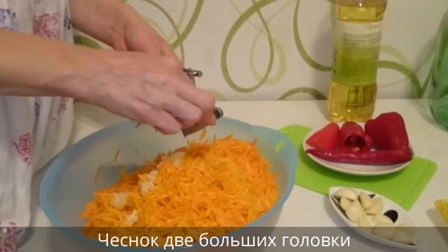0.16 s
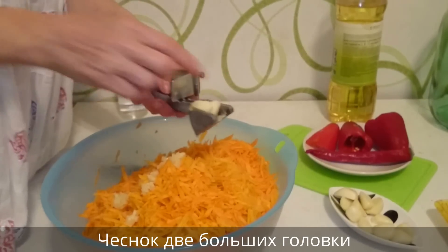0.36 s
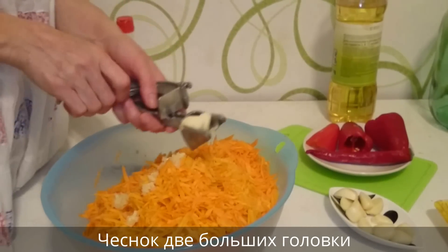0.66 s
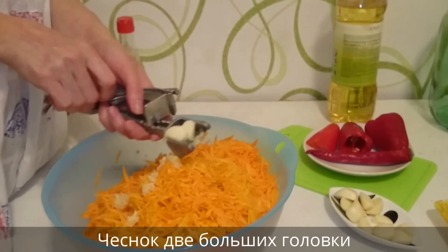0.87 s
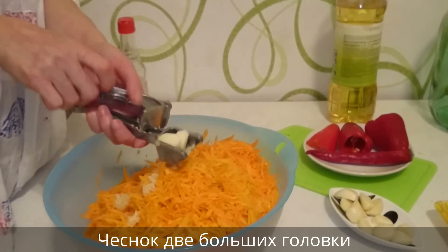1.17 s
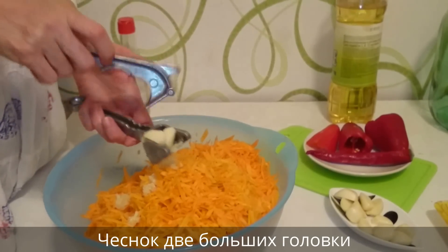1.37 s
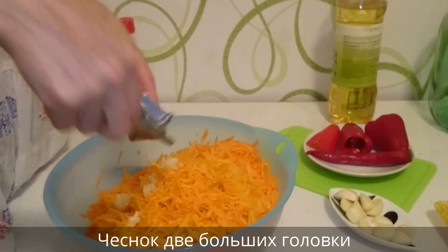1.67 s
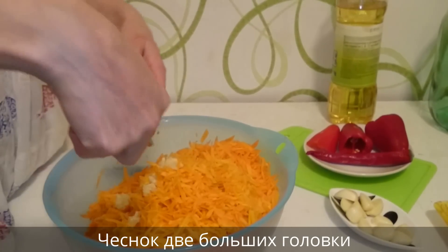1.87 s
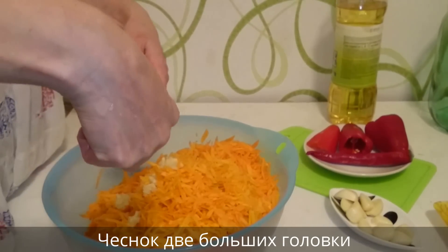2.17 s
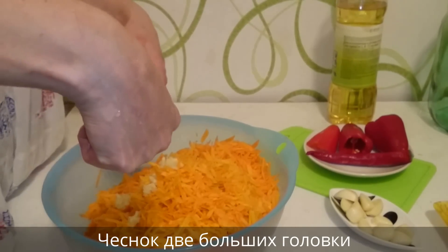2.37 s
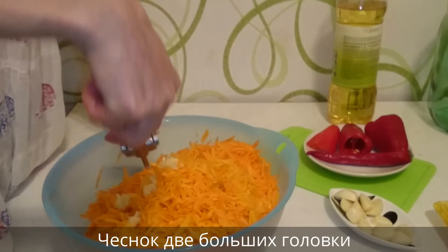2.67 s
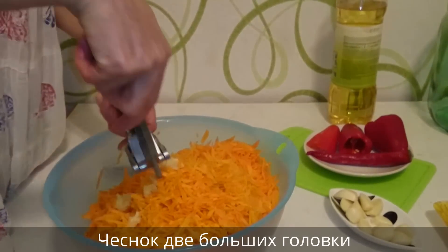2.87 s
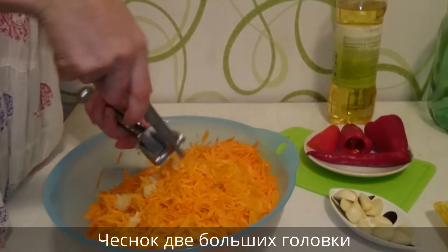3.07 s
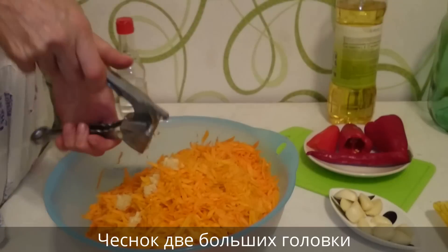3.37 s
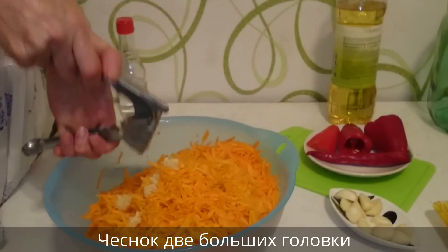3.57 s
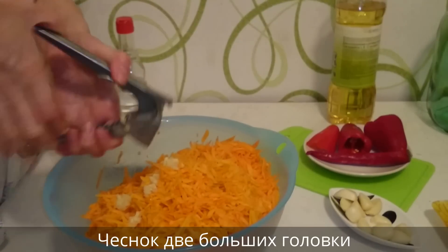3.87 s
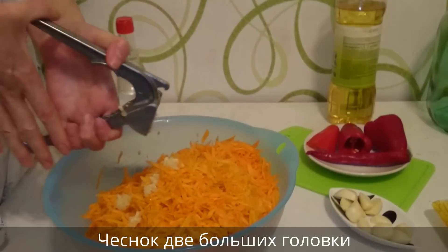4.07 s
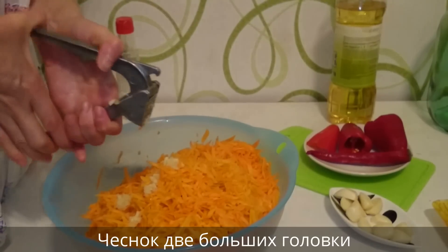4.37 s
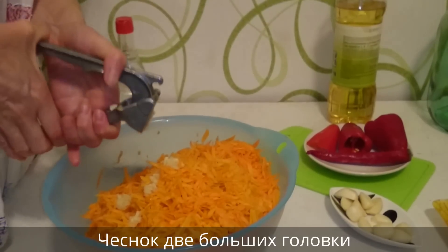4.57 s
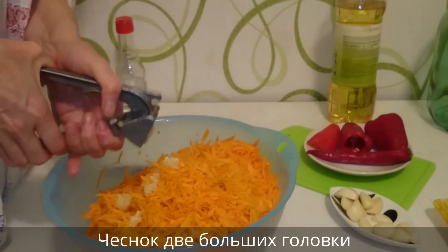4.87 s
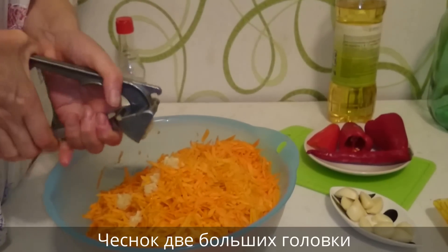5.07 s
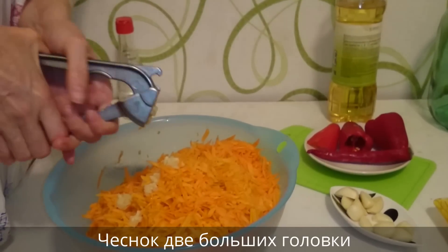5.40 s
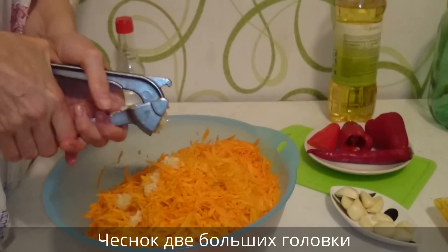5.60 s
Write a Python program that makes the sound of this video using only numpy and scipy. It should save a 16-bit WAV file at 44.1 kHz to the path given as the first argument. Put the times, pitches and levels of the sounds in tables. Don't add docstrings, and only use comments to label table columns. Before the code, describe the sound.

Close up in a small reflective kitchen, hands work a metal garlic press. Light clinks come first, then a pause broken by a wind bump on the right, a burst of hard bright clanks, and finally irregular hinge clicks with garlic crunching and soft scraping. Quiet hiss throughout; the left side is brighter, the right rumbly and duller.

```python
import sys
import numpy as np
from scipy import signal
from scipy.fft import rfft, irfft, next_fast_len
from scipy.io import wavfile
from scipy.ndimage import uniform_filter1d

SR = 44100
rng = np.random.default_rng(int(sys.argv[2]) if len(sys.argv) > 2 else 0)


def log_audio(samples):
    frames = np.atleast_2d(samples).T
    limited = np.clip(frames, -1, 1)
    pcm = np.round(limited * 32767).astype(np.int16)
    wavfile.write(sys.argv[1], SR, pcm)


def boost_factor(decibels):
    exponent = np.asarray(decibels, float) / 20
    return 10 ** exponent


N = 253134


def evened(x):
    return x / np.sqrt(np.mean(x ** 2) + 1e-20)


def read(points, hz):
    f, value = np.transpose(points)
    return np.interp(np.log(hz + 1), np.log(f + 1), value)


def add(mix, start_s, sound):
    part = mix[round(start_s * SR):][:len(sound)]
    part += sound[:len(part)]


def coloured(x, points):
    size = next_fast_len(len(x))
    gain = boost_factor(read(points, np.fft.rfftfreq(size, 1 / SR)))
    return irfft(rfft(x, size) * gain, size)[:len(x)]


def band(x, low_hz, high_hz):
    limits = [low_hz, min(high_hz, SR / 2.1)]
    return signal.sosfilt(signal.butter(2, limits, "band", fs=SR, output="sos"), x)


def clink(peak_db, linger_db, t60_s, crack_db, tilt_db, modes):
    # pitch_hz, level_db per Hz
    crack_colour = [(180, -62.5), (300, -34), (1250, -23.5), (2930, -5.5), (3520, -6), (3830, -1),
                    (5900, -2), (7080, -10), (8790, -13), (10400, -18.5), (12100, -29), (15000, -26.5),
                    (16400, -37)]
    t = np.arange(12000) / SR
    ring, power = 0, 0
    gripped = boost_factor(-60 * t / 0.02)
    for hz, split_hz, db in modes:
        faster = 2.0 + 0.22 * (hz - 4000) / 5000
        linger = boost_factor(linger_db - 60 * t / t60_s * faster)
        for side in (-0.5, 0, 0.4):
            cycles = (hz + side * split_hz) * t + rng.random()
            tone = boost_factor(1.14 * db) * np.sin(2 * np.pi * cycles)
            ring = ring + tone * (gripped + linger)
            power += np.mean(tone ** 2)
    crack = coloured(rng.standard_normal(len(t)), crack_colour)
    crack = evened(coloured(crack, [(2000, -tilt_db), (12000, tilt_db)]))
    blow = ring / np.sqrt(power) + crack * boost_factor(crack_db) * gripped
    blow = blow * np.minimum(t / 0.00037, 1)
    rebound = np.roll(blow, round(0.0031 * SR)) * (t > 0.0028)
    blow = blow + 0.12 * rebound
    return boost_factor(peak_db) * blow / (3.3 * np.std(blow[:round(0.005 * SR)]))


def knocking_parts():
    # (start_s, peak_db, crack_db, crack_brightness_db)
    rattle = ((-9, 0.094), [(2330, 240, 4), (3050, 50, 8), (3800, 73, 15), (5197, 60, 15), (6160, 96, 12),
              (8900, 200, -16)], [(0.6789, -42, 1, 2), (0.6918, -35.5, -2, -1), (0.7098, -33.5, 0, -7),
              (0.7494, -42, -1, -8), (0.7794, -41.5, -5, -34)])
    loading = ((-20, 0.19), [(3950, 41, -5), (5970, 63, 2.5), (6700, 34, -14), (7800, 29, -13),
               (8960, 120, -17), (10150, 170, -28), (14000, 32, -29), (14700, 28, -44), (14800, 37, -39)],
               [(0.9921, -27.5, -4, 5.2)])
    tapped = ((-6.5, 0.13), [(3685, 170, -2), (4060, 200, -6), (4530, 60, -12), (5140, 50, -3.5),
              (5550, 90, -6), (5850, 100, -4), (6070, 52, -2), (7660, 30, -11), (8900, 100, -19),
              (14600, 100, -26)], [(1.0685, -29.5, 1.8, 0), (1.0715, -34.5, 0, 0)])
    swung = ((-2.5, .25), [(1805, 58, -16.5), (2505, 81, -16), (2900, 140, -16), (3672, 64, 4),
             (4380, 89, -1), (5010, 49, -18), (6030, 77, -22), (6770, 81, -4), (7520, 31, -11.5),
             (9940, 23, -10), (10540, 28, -13), (11030, 48, -17), (13800, 140, -25), (14500, 51, -28)],
             [(1.2605, -18.5, 1.5, -3.5), (1.2665, -26, 3.3, -7)])
    closed = ((-15, 0.097), [(1812, 320, -25.5), (4407, 120, -13), (6334, 160, -9), (8800, 140, -46)],
              [(2.2223, -25.5, -8.5, -.5)])
    seated = ((-9, 0.15), [(3030, 48, -11), (3440, 30, -7), (4000, 27, -4.5), (4430, 150, -1.5),
              (5380, 71, -13), (5900, 15, -1), (5780, 34, -0.5), (5850, 18, -1.5), (6720, 100, -17),
              (8950, 96, -7.5), (9080, 22, -14), (9380, 44, -21), (10180, 140, -22.5), (14000, 37, -37)],
              [(2.4189, -36.5, 20.5, -8), (2.4478, -13, -0.5, -1.5), (2.4518, -20, 5, -1.5)])
    squeezed = ((-12.5, .14), [(3890, 25, -14), (4270, 37, -12.5), (4484, 30, -9), (5100, 84, 5),
                (5470, 23, -13.5), (5910, 15, -7.5), (6163, 36, 3), (7030, 81, -3), (7700, 25, -15.5),
                (8140, 62, -9.5), (9740, 50, -7.5), (13200, 35, -40), (14000, 180, -37),
                (14800, 41, -26.5)], [(2.5044, -27, 3, 1), (2.5075, -29, 3, 1), (2.5155, -16, 4, 3.5),
                (2.52, -18.5, 4, 3)])
    eased = ((-30, .057), [(3035, 320, -1), (4630, 190, -3.5), (5100, 690, -23.5), (8650, 110, -22.5)],
             [(2.7571, -37.5, 3, -4), (2.7894, -47, 2.5, -9)])
    tilted = ((-20.5, .1), [(2290, 41, -4.5), (2920, 37, -3.5), (4000, 40, -6), (5550, 60, -4),
              (5700, 41, -10), (7100, 46, 5), (7200, 61, -11.5), (8600, 50, -11), (10700, 100, 2.5),
              (12800, 64, -24), (13700, 220, -26), (14900, 55, -14)], [(2.9287, -21, 2, 0.0047),
              (2.9305, -28, 1.8, 0.011)])
    bottomed = ((-14.5, .16), [(2689, 16, -6), (4600, 39, -16), (5250, 200, -6.5), (5617, 83, -12.5),
                (6380, 27, -15), (7250, 160, -3), (8250, 23, -13), (8780, 82, -3), (9830, 97, -9.5),
                (10600, 120, -13), (11500, 24, -18), (12700, 97, -25.5), (14440, 70, -20.5),
                (14900, 48, -16.5)], [(2.9637, -10.5, 2.4, 6), (2.9662, -13, 1.8, 6.8)])
    released = ((-24.5, .1), [(2720, 130, 6.5), (3080, 41, 4), (4300, 110, -8.5), (5030, 90, -13),
                (5030, 24, -4), (6000, 123, 21), (7900, 18, 8), (8190, 15, -6.5), (10200, 60, -14.5),
                (12500, 100, -25), (13850, 44, -25.5), (15000, 68, -14.5)], [(3.0578, -20, 0, 7)])
    pried = ((-17, .08), [(2300, 260, -15), (3410, 330, -17), (5300, 360, -1), (5590, 86, 4.5),
             (6010, 260, -2), (10700, 330, -20)], [(3.5482, -21.5, -16, 0), (3.5515, -37, -16, 0),
             (3.5565, -37.5, -21, 0)])
    sprung = ((-29, .06), [(2290, 320, -1.5), (3270, 610, -18), (4350, 430, -9), (4900, 400, -3),
              (5720, 700, -1.5), (10700, 460, -9)], [(3.7262, -27, 2.5, -1.8), (3.7285, -32, 3, -2.9),
              (3.732, -46, 3.4, -2)])
    muffled = ((-33, .05), [(2090, 220, -14), (2430, 190, -7), (2700, 210, -11), (3320, 580, -19)],
               [(4.4244, -44, -15, -2), (4.4353, -32, 0, -1), (4.4558, -22, -4, -3), (4.4664, -39, 0, -12)])
    palm = ((-5, 0.15), [(192, 110, 7), (420, 160, -9.5), (557, 270, -6.5), (960, 200, -9.5)],
            [(1.2605, -53, -26, -8), (2.815, -52.5, -26, -4.5), (4.3, -47.5, -26, -8),
            (4.7395, -61, -19, -4)])
    handle = ((-14, 0.13), [(124, 30, -8), (460, 120, -3.5), (630, 69, 0), (833, 138, -7), (1033, 320, -8),
              (2310, 510, -7)], [(5.0318, -35, -30, 0.28)])
    holds = (rattle, loading, tapped, swung, closed, seated, squeezed, eased, tilted, bottomed,
             released, pried, sprung, muffled, palm, handle)
    out = np.zeros(N)
    for ring, modes, strikes in holds:
        for start_s, peak_db, crack_db, tilt_db in strikes:
            add(out, start_s, clink(peak_db, *ring, crack_db, tilt_db, modes))
    return out


def snap(peak_db, hz, low_db, bright_db, ms):
    t = np.arange(2000) / SR
    shape = np.exp(-t * 1000 / ms) * np.minimum(t / 0.0004, 1)
    burst = rng.standard_normal((3, len(t))) * shape
    ring = np.sin(2 * np.pi * hz * t) * shape + 2.4 * band(burst[0], hz * 0.72, hz * 1.4)
    low = band(band(burst[1], 1360, 5300), 1360, 5300)
    bright = band(band(burst[2], 5600, 13200), 5600, 13200)
    out = ring / abs(ring).max()
    out = out + boost_factor(low_db + 15) * low / abs(low).max()
    out = out + boost_factor(bright_db + 2) * bright / abs(bright).max()
    return boost_factor(peak_db - 3.0) * out


def hinge_ticks():
    # start_s, peak_db, ring_hz, low_knock_db, bright_crack_db
    ticks = [(3.2925, -42.5, 6400, -35, -14), (3.3045, -34, 10600, -32.5, -5),
             (3.3222, -37, 5360, -33, -18), (3.3276, -39.5, 11100, -35, -13), (3.346, -25, 4900, -40, -13),
             (3.357, -47, 9600, -32, -30), (3.3648, -29.5, 14900, -40, -15.5),
             (3.368, -37, 14000, -40, -21), (3.4412, -39.5, 5100, -19.5, -6),
             (3.548, -20, 5500, -32.5, -15), (3.6786, -32.5, 7400, -17.5, -12.5),
             (3.726, -25.5, 4660, -21, -9.5), (4.3585, -45.5, 6900, -26, -14),
             (4.4079, -30, 4800, -39, -14), (4.4365, -15.5, 5730, -22.5, -13),
             (4.5062, -33.5, 5840, -33, -13), (4.5703, -31.5, 4970, -19, -5), (4.6127, -30, 6000, -33, -8),
             (4.6193, -25.5, 9100, -33, -9.5), (4.6423, -21.5, 5440, -21.5, -6),
             (4.718, -41.5, 5320, -35, -10), (4.7394, -26, 6500, -15, -12), (4.79, -29.5, 9000, -35, -4.5),
             (4.7919, -20, 5180, -46, -20.5), (4.8586, -26.5, 8860, -28, -32),
             (5.0325, -38.5, 5300, -11, -7), (5.1983, -56.5, 9660, -15.5, 3.5), (5.3289, -61, 4170, -26, 5),
             (5.5163, -26, 5100, -32, -20)]
    out = np.zeros(N)
    for start_s, peak_db, hz, low_db, bright_db in ticks:
        add(out, start_s, snap(peak_db, hz, low_db, bright_db, ms=0.42))
    return out


def clove_crunches():
    # start_s, peak_db, ring_hz, length_ms
    crunches = [(3.35, -52, 5100, 3.2), (3.37, -43, 5300, 5.6), (3.5135, -48, 4850, 0.39),
                (3.537, -34.5, 4700, 1.7), (3.5686, -36, 5590, 1.1), (3.686, -38, 5600, 1.9),
                (3.7314, -49, 5100, 2.8), (4.4254, -26, 4960, 6.2), (4.4398, -17.5, 4700, 0.67),
                (4.4585, -24, 5600, 4.5), (4.4655, -16.5, 5100, 2), (4.648, -26, 5300, 1.8),
                (4.6535, -32, 5300, 1), (4.6485, -20.5, 3350, 0.91), (4.7453, -24.5, 8900, 2.9),
                (4.74, -22, 5740, 1.1), (4.7535, -33, 8400, 1.4), (4.7514, -25.5, 7300, 1.9),
                (4.8657, -29, 5250, 1.2)]
    out = np.zeros(N)
    for start_s, peak_db, hz, ms in crunches:
        add(out, start_s, snap(peak_db, hz, -64 - peak_db, -45.5 - peak_db, ms))
    return out


def scrape(times_s, pressure_db, bright_db):
    # pitch_hz, level_db per Hz
    scrape_colour = [(530, -7), (900, -9), (1390, -11), (2470, -5), (3430, 0.5), (3730, 2), (5680, 2.5),
                     (9530, -4), (12100, -10.5), (14500, -5.5), (16000, -20)]
    t = np.arange(times_s[0], times_s[-1], 1 / SR)
    slips = (rng.random(len(t)) < 14000 / SR) * rng.standard_normal(len(t))
    clumps = boost_factor(5.0 * evened(uniform_filter1d(rng.standard_normal(len(t)), size=120)))
    grit = evened(coloured(slips * clumps, scrape_colour))
    dull = signal.sosfilt(signal.butter(2, 7000, fs=SR, output="sos"), grit)
    grit = dull + (grit - dull) * boost_factor(bright_db)
    pressure = boost_factor(np.interp(t, times_s, pressure_db) - 12.5)
    return grit * pressure * signal.windows.tukey(len(t), 0.03)


def sliding_strokes():
    # full_pressure_from_s, held_s, pressure_db, brightness_db
    strokes = [(0.674, 0.031, -47.5, -10), (.765, 0.03, -51, -12), (3.129, 0.2, -51.5, 0),
               (3.31, 0.026, -54.5, 5), (3.359, 0.022, -49.5, 1), (3.51, 0.063, -47, 1.5),
               (3.67, 0.034, -42, -1.5), (4.287, .012, -56, -8), (4.43, 0.045, -44.5, 2),
               (4.59, 0.038, -49, 8.5), (4.645, 0.011, -52.5, 7), (4.735, 0.03, -36.5, 7),
               (4.82, 0.022, -55, -1), (5.265, .012, -54.5, -14), (5.51, 0.051, -55.5, 14.5),
               (5.575, 0.054, -45, 6.5), (5.725, .02, -42.5, 9)]
    press_s, lift_s, lifted_db = 0.06, 0.16, -24.5
    out = np.zeros(N)
    for full_s, held_s, db, bright_db in strokes:
        times_s = np.cumsum([full_s - press_s, press_s, held_s, lift_s])
        pressure_db = db + lifted_db * np.array([1, 0, 0, 1])
        add(out, times_s[0], scrape(times_s, pressure_db, bright_db))
    return out


def close_by(press):
    # delay_ms, level_db
    near_echoes = [
        [(1.1, -22.5), (2.1, -10), (2.9, -8.5), (3.7, -13), (5.3, -10), (6.6, -15), (8.3, -16)],
        [(.7, -16), (1.6, -17), (2.3, -6.5), (3.3, -11), (4.4, -7.5), (5.9, -14), (7.6, -15.5)],
    ]
    direct_db = [
        [5.5],
        [1.5],
    ]
    near = np.array([press, np.roll(press, 6)])
    for port, echoes in enumerate(near_echoes):
        for ms, db in echoes:
            add(near[port], ms / 1000, boost_factor(db) * press)
    return near * boost_factor(direct_db)


def kitchen(press):
    # pitch_hz, t60_s
    fading = [(300, 0.68), (1500, 0.46), (4000, 0.31), (8000, 0.27), (15000, 0.31)]
    room_db = [
        [1],
        [3],
    ]
    taps = np.zeros((2, SR // 2))
    at = np.arange(200, SR // 2 - 20, 20)
    at = at + rng.integers(0, 20, (2, len(at)))
    np.put_along_axis(taps, at, rng.choice([-1., 1.], at.shape), 1)
    hz, t, z = signal.stft(taps, SR, nperseg=256)
    decay = boost_factor(-60 * t / read(fading, hz)[:, None])
    tail = signal.istft(z * decay, SR, nperseg=256)[1]
    tail = tail * (np.arange(tail.shape[1]) >= 180)
    tail = tail / np.linalg.norm(tail[0])
    return boost_factor(room_db) * signal.fftconvolve(press[None], tail, axes=1)[:, :N]


def gust():
    # peak_s, signed_size, build_up_ms, release_ms
    pushes = [
        (2.167, -0.15, 0.73, 0.88),
        (2.1835, -0.32, 0.39, 0.62),
        (2.1828, -0.2, 7.8, 20),
        (2.435, -0.045, 1.5, 1.3),
        (2.439, -0.09, 0.74, 3.1),
        (2.4408, 0.056, 1.3, 0.53),
    ]
    # time_s, level_db
    air_level = [(2.13, -82), (2.152, -44), (2.158, -34.5), (2.167, -29.5), (2.183, -24.5), (2.185, -56),
                 (2.195, -35)]
    t = np.arange(N) / SR
    membrane = np.zeros(N)
    for peak_s, size, up_ms, down_ms in pushes:
        speed_ms = np.where(t < peak_s, up_ms, down_ms)
        membrane += size * np.exp(-abs(t - peak_s) * 1000 / speed_ms)
    air = rng.standard_normal(N) * boost_factor(np.interp(t, *np.transpose(air_level), -150, -150))
    return membrane + 0.82 * band(air, 4000, 6300) + 0.17 * air + 0.66 * band(air, 88, 1500)


def hush():
    # pitch_hz, level_db per Hz
    left_noise = [(2, -81), (5, -73.5), (9, -78.5), (20, -81.5), (40, -73.5), (100, -88), (250, -89),
                  (600, -97), (1500, -105.0), (4000, -108.9), (8000, -112.0), (12000, -115.1),
                  (13800, -107.0), (16000, -123.4)]
    right_noise = [(2, -37.5), (5, -36.5), (9, -39.5), (20, -48), (40, -67.5), (100, -74.5), (250, -86.5),
                   (600, -93), (1500, -101), (4000, -103.7), (8000, -109.3), (12000, -111.7),
                   (13800, -111.8), (16000, -115.7)]
    # time_s, lowest_rumble_db
    draught = [(0.0, -51.5), (0.48, -42.5), (0.69, -40), (0.8, -49), (0.97, -47), (1.39, -36.5),
               (1.57, -48), (1.98, -43), (2.19, -44), (2.25, -30), (2.53, -48), (2.72, -39), (3.4, -51.5),
               (3.5, -43.5), (4.51, -42.5), (4.6, -47.5), (5.6, -47.5), (5.74, -38)]
    noise_db = [
        [0.8],
        [-2],
    ]
    left = coloured(rng.standard_normal(N) * np.sqrt(SR / 2), left_noise)
    right = coloured(rng.standard_normal(N) * np.sqrt(SR / 2), right_noise)
    deep = signal.sosfiltfilt(signal.butter(2, 60, fs=SR, output="sos"), right)
    usual_db = -46.5
    swell = boost_factor(np.interp(np.arange(N) / SR, *np.transpose(draught)) - usual_db)
    return np.array([left, right + deep * (swell - 1)]) * boost_factor(noise_db)


def port_colour(dry):
    # pitch_hz, level_db
    left_port = [(300, 2), (2700, 1), (4200, 0.5), (5600, -3), (7400, 2), (8800, 7), (11000, 7),
                 (12300, 0.5), (13500, 5.5), (15500, 1.5)]
    right_port = [(300, 6.5), (2700, 1.5), (4200, 1.5), (5600, 6.5), (6500, -1), (7400, -8.5),
                  (8800, -10.5), (10500, -14), (12200, -4.5), (15500, 2)]
    return np.array([coloured(dry[0], left_port), coloured(dry[1], right_port)])


def scene():
    press = knocking_parts() + hinge_ticks() + clove_crunches() + sliding_strokes()
    return close_by(press) + kitchen(press)


def roll_off(x):
    return signal.sosfilt(signal.butter(12, 16490, fs=SR, output="sos"), x)


def record(dry):
    heard = port_colour(dry) + hush()
    heard[1] += gust()
    heard = signal.oaconvolve(heard, signal.firwin(255, 16350, fs=SR)[None], "same", axes=1)
    return roll_off(heard)


dry = scene()
out = record(dry)
log_audio(out)
```